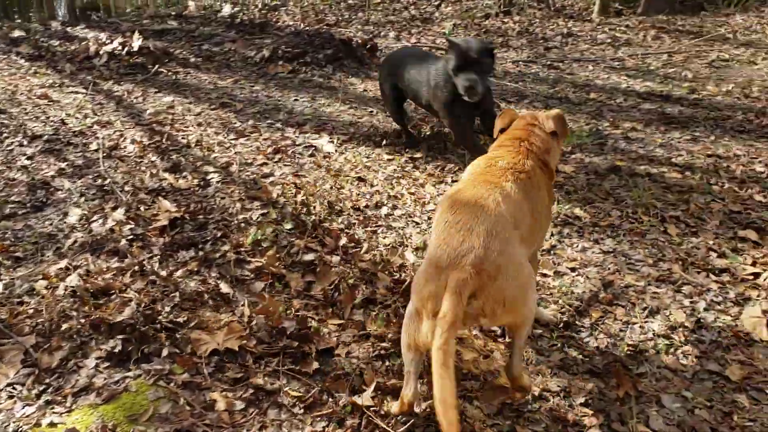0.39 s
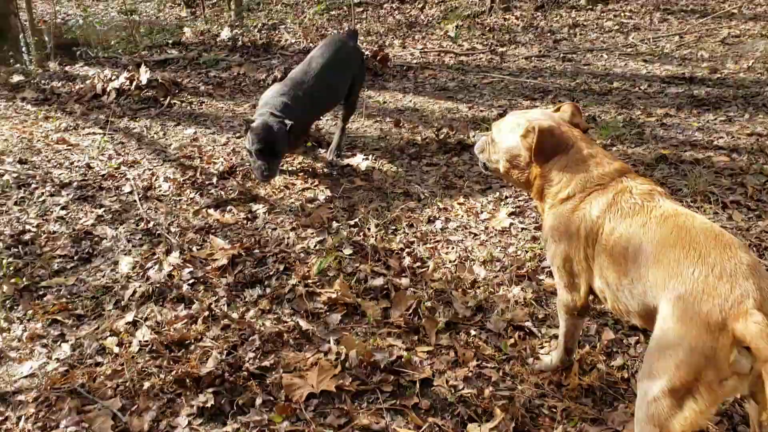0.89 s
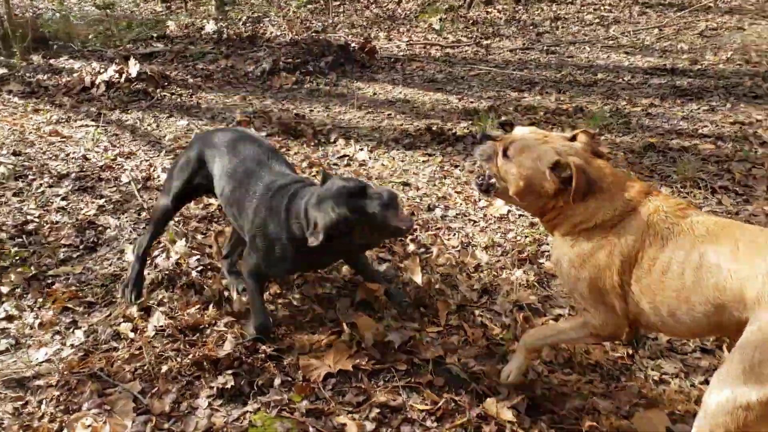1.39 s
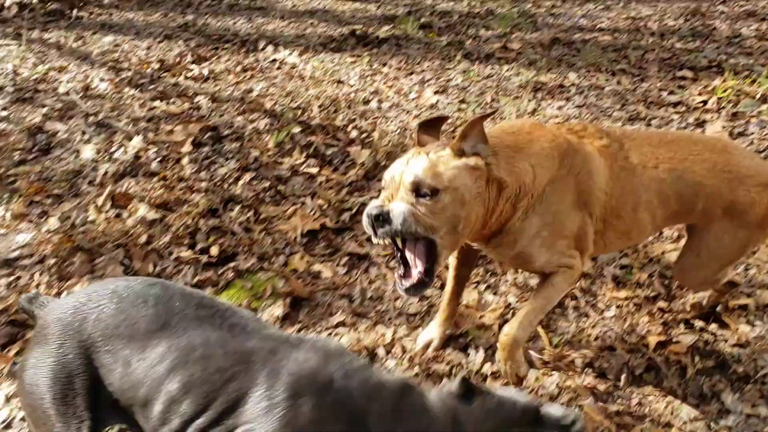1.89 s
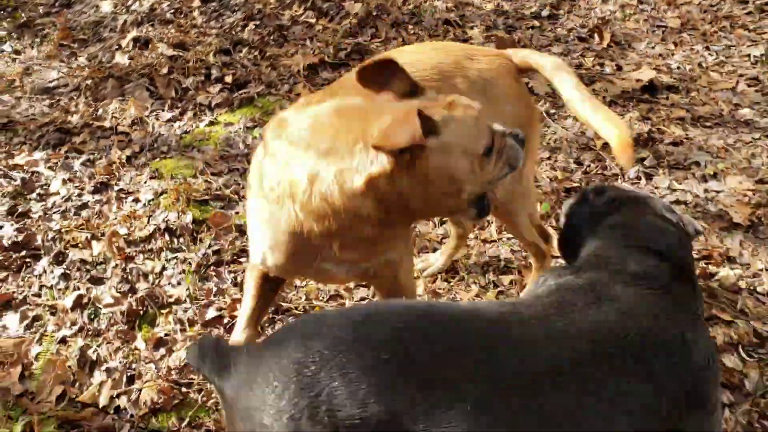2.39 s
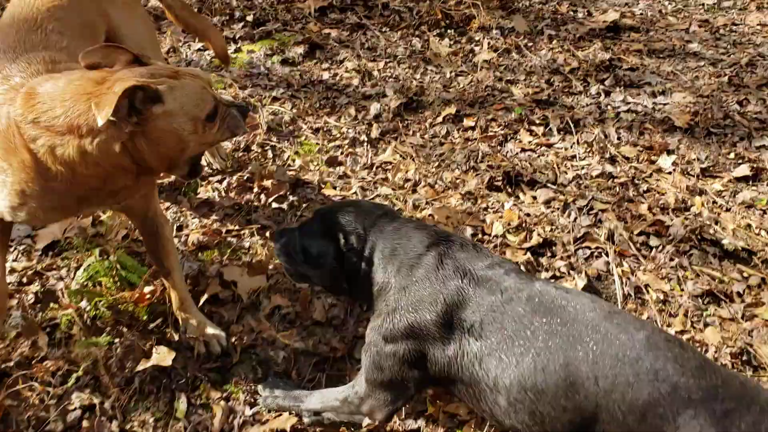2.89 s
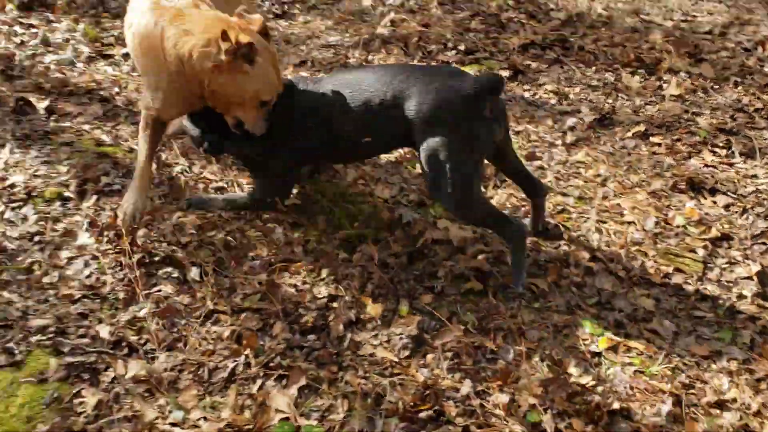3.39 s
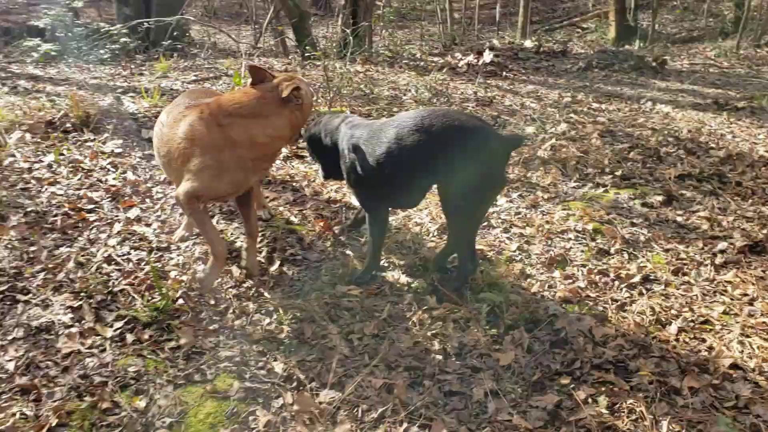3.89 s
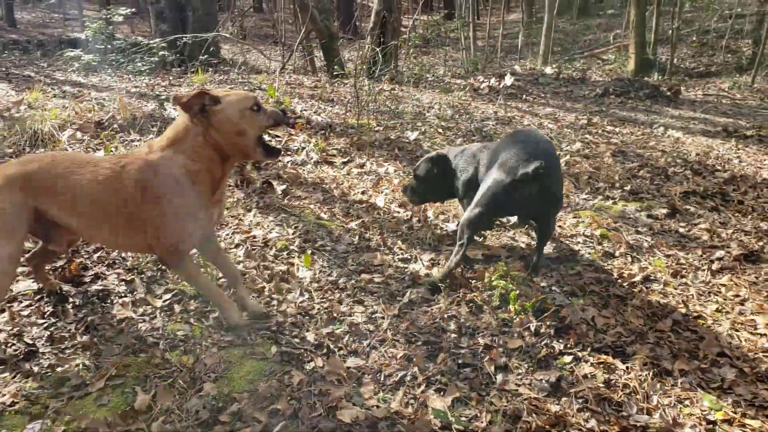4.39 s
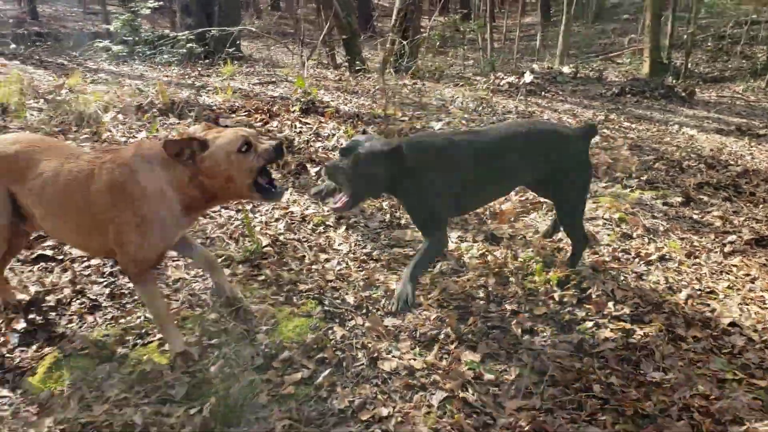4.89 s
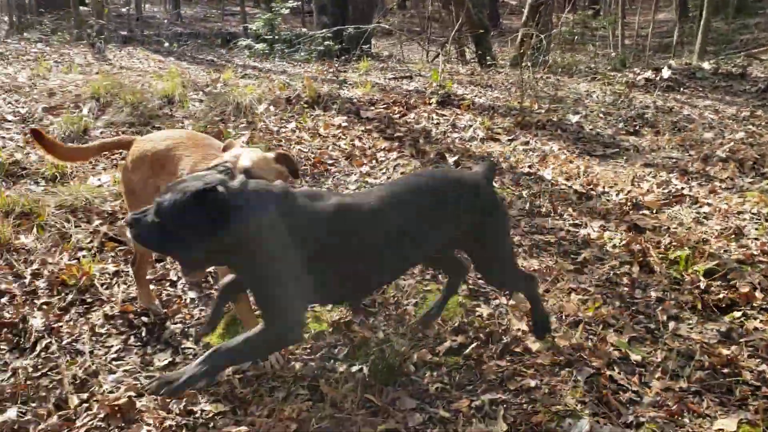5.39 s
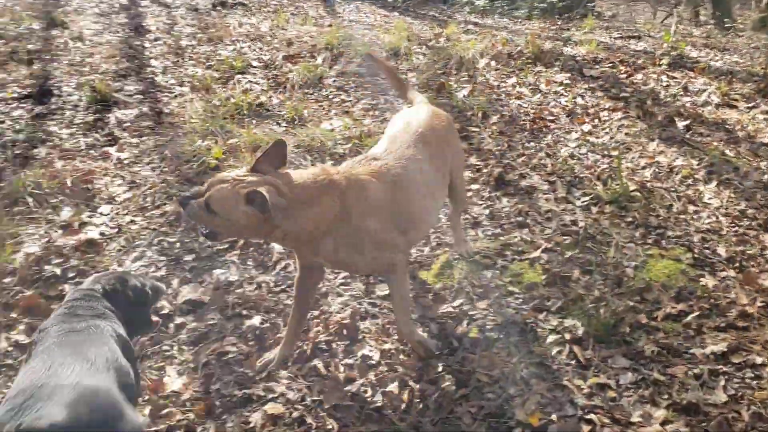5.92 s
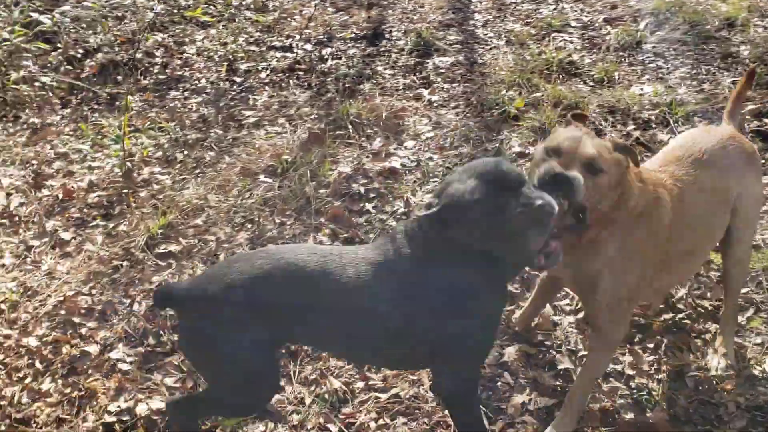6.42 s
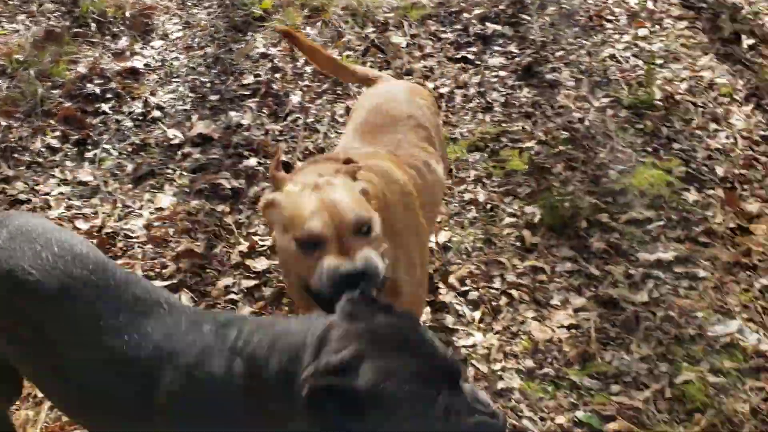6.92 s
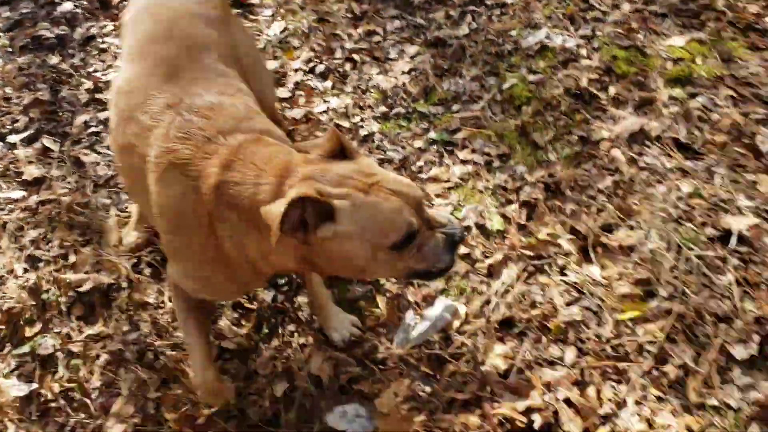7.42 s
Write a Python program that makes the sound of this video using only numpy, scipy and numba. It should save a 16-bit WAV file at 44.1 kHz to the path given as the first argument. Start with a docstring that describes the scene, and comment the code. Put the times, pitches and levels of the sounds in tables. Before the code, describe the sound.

In open woods, close to a handheld stereo phone, two large dogs wrestle over dry leaves. A faint far engine hums beneath a quiet airy hush throughout. Low, fluttering growls open the first half second among rustling scuffs, then ease. Around 1.3 s a growl rises into two sharp, loud overlapping barks, finished by 1.6 s. Leaves crunch harder near 1.9 s; at 2.1 s comes a strong throaty growl with a jaw snap, then a low gruff bark to 2.4 s and busy footfalls. From 3 to 4.3 s the growls are shorter and quieter, with soft low thumps. Two more overlapping barks burst out at 5 s, followed by small jaw clicks near 5.4 s. Crisp steps and growls continue, with a brighter growl and snap at 6.8 s, another snap at 7 s, heavy leaf crunches just after, and rustling to the end at 7.5 s.

```python
"""A far engine drones over the hush of open woods; dry leaves stir and two big dogs growl at once, close by.
They wrestle: slack folds flap and ring mouth, throat and chest; tight folds bark in stacks of harmonics.
Jaws snap as damped rings, paws crush and scuff the litter as coloured noise; low thumps, decaying sines,
sound beneath the growls. Trunks return a faint echo of the voices through delay lines;
a phone with two ports picks it all up."""
import sys
import numpy as np
from scipy import signal
from scipy.fft import rfft, irfft, next_fast_len
from scipy.io import wavfile
from scipy.ndimage import uniform_filter1d
from numba import njit

SR = 44100
rng = np.random.default_rng(int(sys.argv[2]) if len(sys.argv) > 2 else 0)


def convert_level_to_amplitude(level_db):
    """Map a level in decibels to its linear amplitude factor."""
    exponent = np.asarray(level_db, float) / 20
    return 10 ** exponent


def unload_wav(signal):
    """Save mono or channel-first audio to the path in sys.argv[1] as 16-bit WAV at rate SR, clipped to [-1, 1]."""
    wavfile.write(
        sys.argv[1],
        SR,
        np.round(np.clip(np.atleast_2d(signal).T, -1, 1) * 32767).astype(np.int16),
    )


N = 332514
T = np.arange(N) / SR


def unit(x):
    """Scale to rms 1."""
    return x / np.sqrt(np.mean(x ** 2) + 1e-18)


def shape(points, hz):
    """Gain at hz of a (Hz, dB) spectrum, straight in dB over log frequency."""
    point_hz, db = np.transpose(points)
    return convert_level_to_amplitude(np.interp(np.log(np.maximum(hz, 1)), np.log(point_hz), db))


def colour(x, points):
    """Give a flat sound the spectrum, rms 1."""
    size = next_fast_len(N)
    gain = shape(points, np.fft.rfftfreq(size, 1 / SR))
    return unit(irfft(rfft(x, size) * gain, size)[..., :N])


def walk(rate_hz):
    """Random levels held 1 / rate_hz and slewed twice; rms 1."""
    k = int(SR / rate_hz)
    held = np.repeat(rng.standard_normal(N // k + 1), k)
    return unit(uniform_filter1d(uniform_filter1d(held, k), k)[:N])


def swell(t, peak_s, rise_s, fall_s):
    """Straight up from 0 to 1 at the peak and straight down again."""
    return np.clip(np.minimum(1 + (t - peak_s) / rise_s, 1 - (t - peak_s) / fall_s), 0, 1)


def call(table):
    """Samples that a call covers, its columns over them, and an 11 ms fade at both ends."""
    s, *columns = np.transpose(table)
    at = slice(int(s[0] * SR), int(s[-1] * SR))
    fade = np.clip(np.minimum(T[at] - s[0], s[-1] - T[at]) / 0.011, 0, 1)
    return at, [np.interp(T[at], s, c) for c in columns], fade


@njit
def svf(x, hz, width):
    """State-variable band-pass with a moving centre, gain 1 there."""
    y, band, low = np.empty(len(x)), 0., 0.
    for i in range(len(x)):
        g, k = np.tan(np.pi * hz[i] / SR), width / hz[i]
        v = (band + g * (x[i] - low)) / (1 + g * (g + k))
        band, low, y[i] = 2 * v - band, low + 2 * g * v, k * v
    return y


def ring(x, hz, width_hz):
    """A resonance applied twice, so the valleys beside it stay dark; rms 1."""
    hz = hz + np.zeros(len(x))
    return unit(svf(svf(x, hz, width_hz), hz, width_hz))


def drone():
    """Far engine: steady multiples of the firing rate, wavering a little on the long way here."""
    # engine course: start_s, firing_hz, level_db
    engine = [(0, 71.44, -42.5), (2, 69.57, -54.5), (3.4, 70.73, -51.5), (4.7, 69.53, -45.5),
              (6.299, 69.85, -48), (7.54, 67.7, -45.5)]
    # firing multiples: multiple, relative_db
    orders = [(1, -15), (2, -0.5), (3, -13), (4, -11), (5, -17.5), (6, -21), (7, -28.5)]
    s, hz, level_db = np.transpose(engine)
    phase = 2 * np.pi * np.cumsum(np.interp(T, s, hz)) / SR
    lines = sum(convert_level_to_amplitude(order_db + 1.73 * walk(2.6)) * np.sin(k * phase + k * k) for k, order_db in orders)
    return np.sqrt(2) * convert_level_to_amplitude(np.interp(T, s, level_db)) * lines


def hush():
    """Distant rumble and air: coloured noise, swelling slowly, nearly alike at both ports."""
    # spectrum of the woods: freq_hz, relative_db (per Hz)
    woods = [(15, -43), (25, -17.5), (88, -9), (140, -17.5), (184, -14), (287, -26), (567, -29), (732, -23),
             (2030, -38.5), (4000, -32), (5200, -46), (8800, -120)]
    level_db = -52
    mid, side = colour(rng.standard_normal((2, N)), woods) * convert_level_to_amplitude(level_db + 0.38 * walk(3.22))
    return mid + 0.19 * side * np.array([[1], [-1]])


def litter_level():
    """Strength of the leaf cracks: constant stir, scuffs that lift it, steps that swell fast and die away."""
    # litter always stirring: start_s, level_db
    stir = [(0, -44), (0.9, -43), (1.17, -53), (1.23, -44.5), (2.3, -46.5), (4.1, -44.5), (5.4, -45),
            (7.0, -52.5), (7.54, -36.5)]
    # paws sliding through the litter: peak_s, peak_db, rise_s, fall_s
    scuffs = [(0.135, -36, 0.056, 0.6), (0.405, -33.5, 0.22, 0.054), (0.51, -34, 0.1, 0.15),
              (0.729, -32, 0.021, 0.076), (0.88, -35, 0.16, 0.15), (1.489, -30.5, 0.18, 0.071),
              (1.82, -35, 0.33, 0.05), (1.985, -31, 0.075, 0.085), (2.52, -31, 0.038, 0.21),
              (2.8, -30.5, 0.2, 0.29), (2.97, -33, 0.1, 0.11), (3.2, -34.5, 0.17, 0.3),
              (3.469, -39.5, 0.15, 0.032), (3.69, -35, 0.11, 0.022), (3.88, -36, 0.046, 0.11),
              (4.62, -37.5, 0.091, 0.03), (5.09, -37.5, 0.31, 0.061), (5.591, -43.5, 0.017, 0.33),
              (6.07, -34, 0.12, 0.085), (6.57, -39.5, 0.53, 0.64), (7.1, -34.5, 0.18, 0.2),
              (7.36, -37, 0.48, 0.37), (7.499, -27.5, 0.079, 0.036)]
    # single crunching steps: start_s, crack_db
    steps = [(0.6235, -30.5), (0.645, -36), (0.96, -33), (1.2017, -26), (1.7532, -23.5), (1.919, -24.5),
             (1.9524, -21), (2.0288, -25), (2.055, -28.5), (2.182, -24.5), (2.3605, -28), (2.379, -23.5),
             (2.4024, -24), (2.444, -27), (2.4976, -22), (2.5543, -17.5), (2.9327, -27), (3.0195, -22),
             (3.2106, -34), (3.2485, -24), (3.4047, -30.5), (4.0682, -28.5), (4.1629, -28.5),
             (4.272, -25.5), (4.4508, -25), (5.095, -20), (5.328, -26), (5.4525, -28), (5.507, -24.5),
             (5.583, -23), (5.644, -21.5), (5.8906, -22.5), (5.9718, -26), (6.044, -18.5), (6.1963, -25.5),
             (6.3101, -31), (6.3684, -31), (6.406, -23), (6.543, -31), (6.745, -27), (7.0325, -21.5),
             (7.0773, -15.5), (7.23, -25), (7.298, -22.5), (7.3966, -25), (7.4599, -30)]
    step_rise_s, step_t60_s = 0.013, 0.1
    stir_db = np.interp(T, *np.transpose(stir))
    lifts_db = [(db - stir_db) * swell(T, s, rise_s, fall_s) for s, db, rise_s, fall_s in scuffs]
    level = convert_level_to_amplitude(stir_db + np.max(lifts_db, axis=0) + 2.36 * walk(45))
    for start_s, crack_db in steps:
        age = T - start_s
        # the loudest cracks of a step stand above its mean level
        decay = convert_level_to_amplitude(crack_db - 2.5 - 60 * np.maximum(age, 0) / step_t60_s)
        level = np.hypot(level, decay * np.clip(age / step_rise_s, 0, 1))
    return level


def leaves():
    """Dense noise cracks of dry leaves, some louder; each port hears mostly its own cracks."""
    # spectrum of the cracks: freq_hz, relative_db (per Hz)
    leaf = [(710, -11.5), (1200, -5), (2060, -7.5), (2890, -7), (5350, 0), (9210, -3.5), (12200, 1.5),
            (15800, -2.5), (16100, -38)]
    pan_db = -3.5  # mean, left minus right
    size = convert_level_to_amplitude(1.55 * np.repeat(rng.exponential(size=N // 24 + 1), 24)[:N])
    both, left, right = size * rng.standard_normal((3, N))
    cracks = colour(np.array([left, right]) + 0.33 * both, leaf)
    # small and large leaves take turns: the crisp top and the duller crunch wander apart
    dull = signal.sosfilt(signal.butter(2, 7500, fs=SR, output="sos"), cracks)
    deep = signal.sosfilt(signal.butter(2, 3500, fs=SR, output="sos"), dull)
    crunch = convert_level_to_amplitude(0.63 * walk(30)) * deep + convert_level_to_amplitude(1.3 * walk(18)) * (dull - deep)
    crisp = convert_level_to_amplitude(1.85 * walk(18)) * (cracks - dull)
    side_db = pan_db + 1.1 * walk(3.42)
    return litter_level() * (crunch + crisp) * convert_level_to_amplitude(np.array([side_db, -side_db]) / 2)


def flaps(rate_hz, rough):
    """Slack folds: uneven flaps as pulses, each with a decaying puff of air; both grow rougher together."""
    chance = rng.standard_normal((200, 2))
    flap = np.cumsum(np.exp(0.55 * rough * chance[:, 0]))
    cycles = np.cumsum(rate_hz) / SR
    inside = flap < cycles[-1]
    pulses = np.zeros(len(rate_hz))
    at = np.searchsorted(cycles, np.append(0, flap[inside]))
    pulses[at] = convert_level_to_amplitude(4 * rough * np.append(-1, chance[inside, 1]))
    puff_level = signal.lfilter([1], [1, -np.exp(-1 / (0.012 * SR))], pulses)  # 12 ms decay
    puff = puff_level * rng.standard_normal(len(rate_hz))
    return unit(pulses) + 2.3 * rough * unit(puff)


def growls():
    """Uneven flaps of the folds ring mouth, throat, upper throat and chest; mouth and throat sink with level."""
    # growls: peak_s, mouth_peak_db, rise_s, fall_s, mouth_hz
    growl_table = [(0.085, -41.5, .08, 0.13, 755), (0.19, -37, 0.09, 0.095, 726),
                   (0.29, -50, 0.046, 0.044, 900), (0.37, -50.5, 0.061, 0.098, 766),
                   (0.716, -48, 0.037, 0.14, 663), (1.3, -37.5, .04, 0.041, 810),
                   (1.361, -31.5, 0.041, 0.031, 660), (1.55, -43.5, 0.033, 0.13, 850),
                   (1.99, -44, 0.095, 0.054, 1070), (2.14, -17.5, 0.072, 0.08, 827),
                   (2.18, -21, 0.036, 0.053, 740), (2.419, -32, 0.032, 0.2, 700),
                   (2.545, -43.5, 0.019, 0.27, 996), (2.99, -43.5, 0.05, 0.11, 920),
                   (3.125, -38, 0.071, 0.033, 924), (3.56, -35.5, 0.05, .12, 825),
                   (3.645, -39.5, 0.075, 0.12, 960), (3.85, -42.5, .15, 0.15, 794),
                   (4.0, -38.5, 0.12, 0.21, 806), (4.318, -38.5, 0.086, 0.061, 980),
                   (5.115, -37, 0.022, 0.089, 918), (5.2, -37.5, 0.086, 0.064, 880),
                   (5.44, -46, 0.058, 0.1, 997), (5.66, -30.5, .075, 0.079, 780),
                   (5.78, -48, 0.045, 0.2, 744), (5.942, -51, 0.075, 0.078, 973),
                   (6.161, -49.5, 0.14, 0.06, 784), (6.529, -47.5, .13, 0.064, 670),
                   (6.576, -34, 0.028, 0.046, 780), (6.613, -33, 0.024, 0.054, 900),
                   (6.72, -37, 0.043, 0.069, 776), (6.789, -25, 0.049, 0.033, 750),
                   (6.85, -51, 0.04, 0.1, 610), (6.949, -44.5, 0.016, 0.079, 810),
                   (7.04, -36, .03, .12, 950), (7.185, -43, 0.065, 0.054, 956)]
    # hold of folds and throat: start_s, flap_hz, roughness (0-1), throat_hz, throat_db (re mouth), chest_db
    folds = [(0.17, 85, 0.55, 340, -1, -41.5), (0.29, 72.5, 0.45, 204, 7.5, -51),
             (0.8, 83, 0.73, 250, -21, -50), (1.35, 107, 0.56, 235, 2, -39.5),
             (1.6, 129, 0.69, 400, -5.5, -55), (1.992, 109, 0.59, 320, -6, -52),
             (2.151, 115.5, 0.44, 348, -8, -47.5), (2.448, 136, 0.48, 277.4, -9, -49),
             (2.98, 100, .3, 208, 4.5, -60), (3.1, 90, 0.53, 190, -10, -46.5),
             (3.55, 95, 0.62, 213, -16, -41.5), (3.712, 88, 0.46, 212, 2, -47),
             (4.001, 78.7, 0.53, 254, -27, -48.5), (4.32, 138, 0.61, 230, -27.5, -51.5),
             (5.202, 86, 0.53, 270, -21, -46), (5.449, 50, 0.7, 435, 2, -47),
             (5.639, 134, 0.34, 378, -2.5, -44.5), (6.101, 93, 0.66, 294, -11, -53),
             (6.499, 95, 0.75, 333, 3.5, -45.5), (6.789, 122, 0.5, 426, -1.5, -49),
             (6.868, 97, 0.41, 376, 11.5, -48), (7.1, 120, 0.58, 405, -4.5, -48)]
    # upper throat resonances: centre_hz, width_hz, relative_db
    rasp = [(1201, 160, 4), (1647, 176, -1), (2060, 230, 0)]
    # lips drawn back, which brightens the growl: start_s, rasp_db (re mouth)
    snarl = [(0.1, -15), (0.8, -7), (1.35, -23.5), (1.6, -6.5), (2.0, -12), (2.14, -26), (2.45, -21.5),
             (2.6, -7.5), (3.1, -13), (3.58, -15), (3.78, -4.5), (4.0, -16), (4.3, -10), (5.2, -14.5),
             (5.45, -14), (5.64, -21), (6.0, -9), (6.5, -17.5), (6.6, -5.5), (6.79, -26), (6.96, -6.5),
             (7.2, -10)]
    quiet_db, fullness = -57, 0.55  # level at both ends; under 1 the swell lingers near its peak
    throat_follow, chest_follow = 1, 0.16  # dB lost for each dB the mouth loses
    mouth_wander, flap_wander, rasp_wander = 0.064, 0.12, 0.1  # shares of drift
    mouth_sag, throat_sag = 0.0035, 0.0054  # share by which the resonance sinks for each dB lost
    out, jaw, slack = np.zeros(N), walk(14), walk(9)
    tongue = [walk(16) for _ in rasp]
    s, *held = np.transpose(folds)
    for peak_s, peak_db, rise_s, fall_s, mouth_hz in growl_table:
        at, _, fade = call([(peak_s - rise_s,), (peak_s + fall_s,)])
        flap_hz, rough, throat_hz, throat_db, chest_db = (np.interp(T[at], s, c) for c in held)
        drop_db = (quiet_db - peak_db) * (1 - swell(T[at], peak_s, rise_s, fall_s) ** fullness)
        source = flaps(flap_hz * np.exp(flap_wander * slack[at]), rough.mean())

        mouth_hz = mouth_hz * (1 + mouth_wander * jaw[at] + mouth_sag * drop_db)
        mouth = ring(svf(source, mouth_hz, 570.0), mouth_hz, 268.0)
        voice = convert_level_to_amplitude(peak_db + drop_db) * mouth

        sunk_hz = throat_hz * (1 + throat_sag * drop_db)
        throat = ring(svf(source, throat_hz, 300.0), sunk_hz, 130.0)
        voice += convert_level_to_amplitude(peak_db + throat_db + throat_follow * drop_db) * throat

        rasp_db = peak_db + drop_db + np.interp(T[at], *np.transpose(snarl))
        for (hz, width_hz, top_db), move in zip(rasp, tongue):
            voice += convert_level_to_amplitude(rasp_db + top_db) * ring(source, hz * (1 + rasp_wander * move[at]), 1. * width_hz)

        voice += convert_level_to_amplitude(chest_db + chest_follow * drop_db) * ring(source, 132, 110.0)
        out[at] += fade * voice
    return out


@njit
def trunks(x, lags, gain, damp):
    """Echo off the trunks: eight delay lines that feed each other, duller on every round."""
    line, soft, out = np.zeros((8, 8192)), np.zeros(8), np.zeros((2, len(x)))
    for i in range(len(x)):
        total = 0.
        for k in range(8):
            soft[k] += (1 - damp) * (gain[k] * line[k, (i - lags[k]) & 8191] - soft[k])
            total += soft[k]
            out[k % 2, i] += soft[k]
        for k in range(8):
            line[k, i & 8191] = x[i] + soft[k] - total / 4
    return out


def woods_echo(dogs):
    """Faint two-sided return of the voices, dying 60 dB in t60_s at the bass and sooner above."""
    t60_s, damp, level_db = 0.78, 0.3, -24.5
    lags = rng.integers(700, 6000, 8)  # samples
    return convert_level_to_amplitude(level_db) * trunks(dogs, lags, convert_level_to_amplitude(-60 * lags / SR / t60_s), damp)


def barks():
    """Tight folds: clear harmonics through the open mouth; roughness shakes pitch and size and adds air."""
    # one list a bark: start_s, pitch_hz, level_db, roughness (0-1)
    bark_tables = [
        [(1.35, 280.3, -53, 0.3), (1.378, 308.4, -25, 0.34), (1.408, 352.7, -20, 0.4),
         (1.424, 393.5, -14, 0.33), (1.445, 390, -25, 0.2)],
        [(1.422, 345, -27, 0.13), (1.442, 330.5, -6, 0), (1.468, 330.6, -10.5, 0.08), (1.485, 328, -15.5, 0.25),
         (1.503, 324.4, -12.5, 0.01), (1.52, 299.4, -20.5, 0.56), (1.565, 275, -42, 0.84)],
        [(4.953, 318.6, -34, 0.53), (4.975, 335.3, -19, 0.62), (5.002, 335.3, -7.5, 0.15),
         (5.02, 375.5, -13, 0.23), (5.04, 399.2, -17, 0.26), (5.075, 364.5, -17.5, 0.59),
         (5.108, 349, -28, 0.26)],
        [(4.995, 268.3, -43, 0.15), (5.015, 281.5, -21.5, 0.14), (5.04, 296.3, -13, 0.34),
         (5.06, 300.5, -18.5, 0.18), (5.1, 304, -39, 0.3)],
        [(2.25, 187, -30.5, 0.5), (2.272, 190.9, -21, 0.43), (2.3, 192.8, -19.5, 0.35),
         (2.335, 168.5, -30.5, 0.51), (2.355, 155.1, -22, 0.43), (2.385, 149.4, -28.5, 0.43),
         (2.415, 147, -37, 0.4)],
    ]
    # open mouth for the first two barks, the next two (which overlap) and the low one: freq_hz, gain_db
    mouths = [
        [(200, -50), (340, -22.5), (660, -3), (780, -5), (1000, -21.5), (1330, -12), (1660, -22.5), (2000, -21),
         (2320, -26), (2700, -24), (3300, -62)],
        [(200, -35), (360, -21), (540, -7), (680, 1.5), (800, 2.5), (960, -17), (1150, -1.5), (1320, -12),
         (1480, -21.5), (1750, -8.5), (2000, -18), (2300, -22), (2650, -23), (3300, -71)],
        [(170, -20), (360, 0.5), (470, 2.5), (600, -4), (780, 5), (950, -9.5), (1250, -21.5), (1450, -18.5),
         (1750, -42), (2050, -23), (2400, -51), (2700, -32), (3100, -53)],
    ]
    out, shake, throb = np.zeros(N), walk(300), walk(120)
    for i, table in enumerate(bark_tables):
        mouth = mouths[i // 2]
        at, (hz, level_db, rough), fade = call(table)
        rough = np.clip(rough, 0, 1)
        air = colour(rng.standard_normal(N), mouth)[at]
        phase = 2 * np.pi * np.cumsum(hz * (1 + 0.12 * rough * shake[at])) / SR
        harmonics = range(1, int(3000 / hz.max()))
        stack = sum(shape(mouth, k * hz) * np.sin(k * phase + k * k / 2) for k in harmonics)
        level = convert_level_to_amplitude(level_db + 3.9 * rough * throb[at])
        out[at] += level * fade * (unit(stack) + 1.06 * rough * air)
    return out


def snaps():
    """Jaws clap shut: a short damped ring of the mouth."""
    # jaw snaps: start_s, peak_db, ring_hz
    snap_table = [(1.904, -31, 1150), (2.128, -18, 806), (5.421, -36, 1024), (5.454, -34, 1020),
                  (6.78, -23, 734), (6.994, -27, 810)]
    decay_s = 0.0057  # to 1/e
    out, age = np.zeros(N), T[:1500]
    for start_s, peak_db, hz in snap_table:
        at = int(start_s * SR)
        out[at:at + len(age)] += convert_level_to_amplitude(peak_db) * np.exp(-age / decay_s) * np.sin(2 * np.pi * hz * age)
    return out


def low_thumps():
    """Short low thumps beneath the growls, decaying sines."""
    # low thumps: start_s, peak_db, thump_hz
    thump_table = [(2.565, -44, 59.2), (3.1, -42, 67.3), (3.552, -48, 84), (3.749, -41, 76),
                   (4.049, -44, 61.9), (4.199, -36.5, 72.7), (5.141, -40.5, 83.4), (5.199, -39, 84),
                   (7.051, -39, 84.5)]
    t60_s = 0.35
    out, age = np.zeros(N + SR), T[:SR // 2]
    for start_s, peak_db, hz in thump_table:
        at = int(start_s * SR)
        out[at:at + len(age)] += convert_level_to_amplitude(peak_db - 60 * age / t60_s) * np.sin(2 * np.pi * hz * age)
    return out[:N]


def ports(dogs):
    """The voices reach the right port a little late and a little duller."""
    lag_s, left_bright = 4e-5, 0.47  # share of the top that the left gains and the right loses
    high_pass = signal.butter(2, 1300, "high", fs=SR, output="sos")
    top = left_bright * signal.sosfiltfilt(high_pass, dogs)
    late = np.interp(T - lag_s, T, dogs - top)
    return np.array([convert_level_to_amplitude(-0.92) * (dogs + top), convert_level_to_amplitude(1.76) * late])


def scene():
    """Voices at both ports with their echo, over leaves, low thumps, engine and woods."""
    dogs = growls() + barks() + snaps()
    return ports(dogs) + woods_echo(dogs) + leaves() + low_thumps() + drone() + hush()


def band_limit(x):
    """A steep low-pass at the top of the band."""
    return signal.sosfilt(signal.butter(12, 16980, fs=SR, output="sos"), x)


def record(dry):
    """The phone cuts the deepest bass and rounds the loudest peaks."""
    wet = signal.sosfilt(signal.butter(3, 42, "high", fs=SR, output="sos"), dry)
    rounded = wet / (1 + wet ** 4) ** 0.22
    return band_limit(rounded)


dry = scene()
out = record(dry)
unload_wav(out)
```